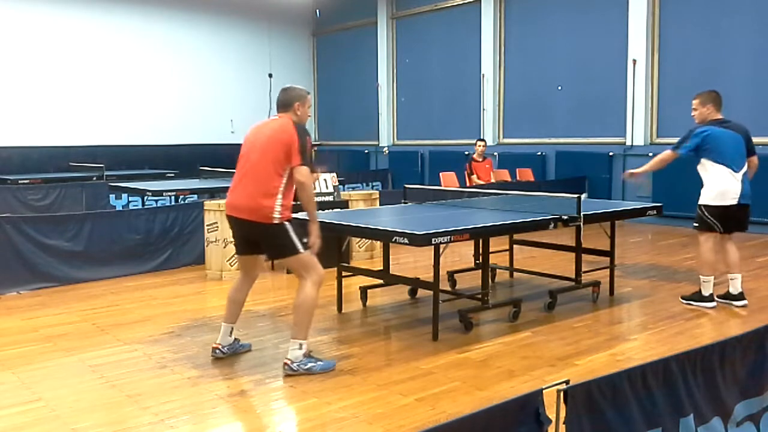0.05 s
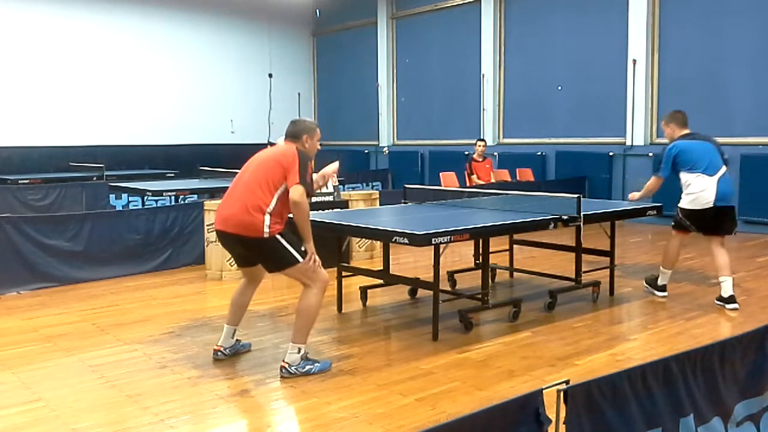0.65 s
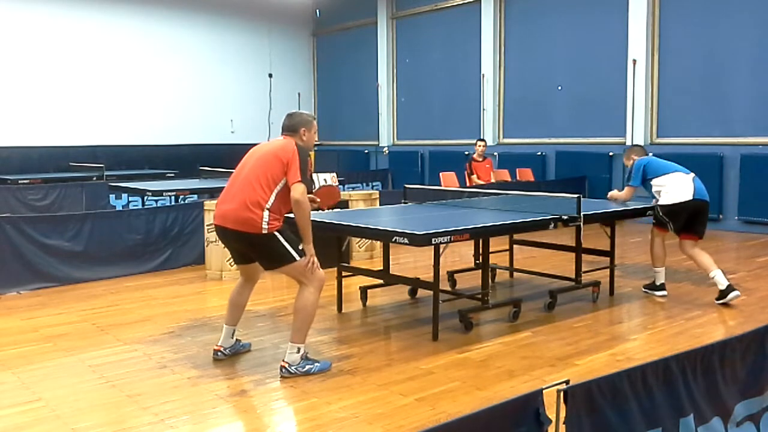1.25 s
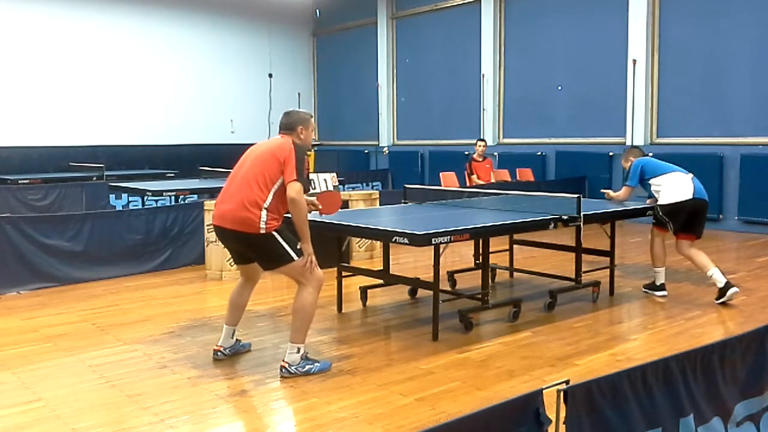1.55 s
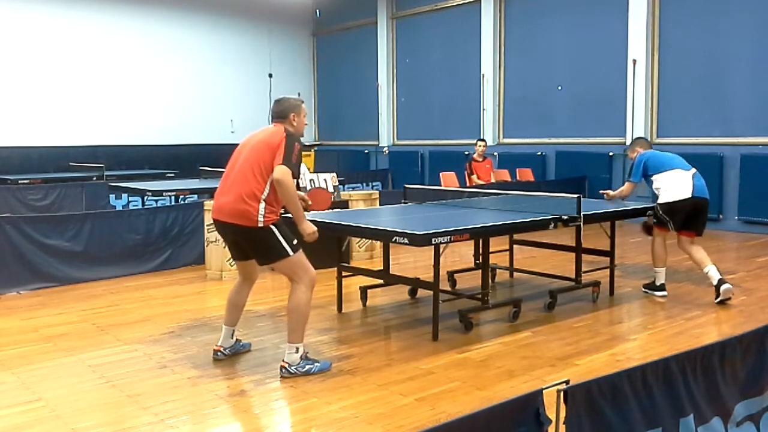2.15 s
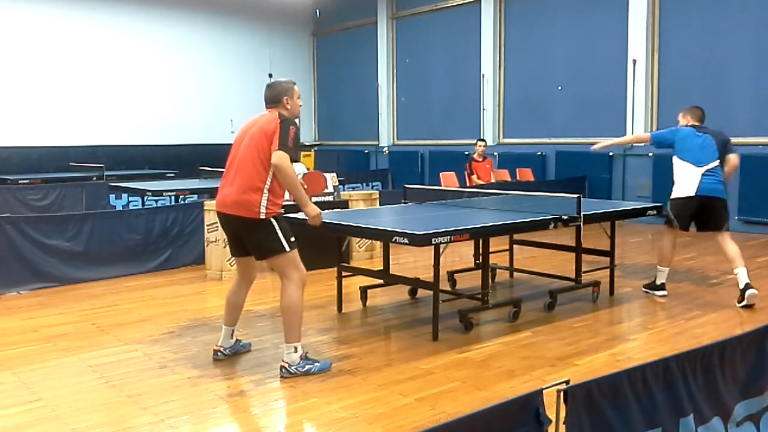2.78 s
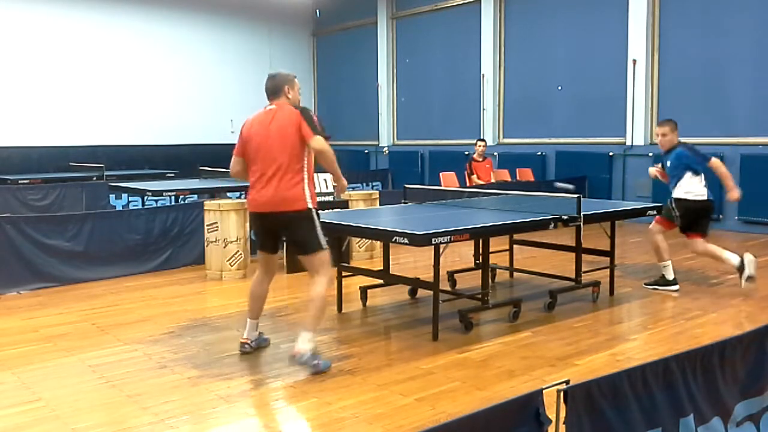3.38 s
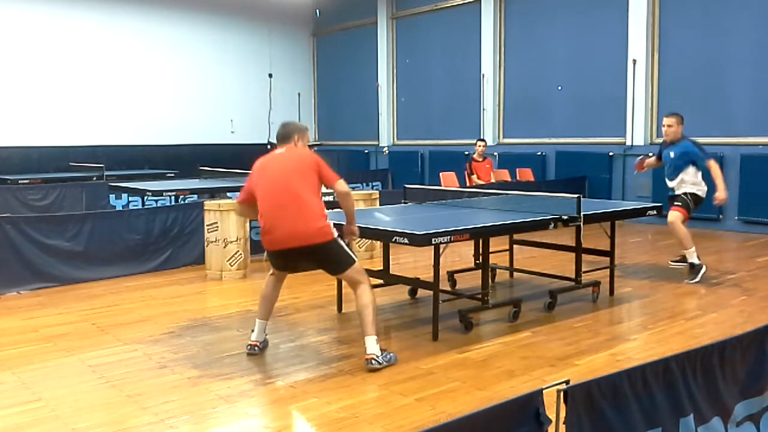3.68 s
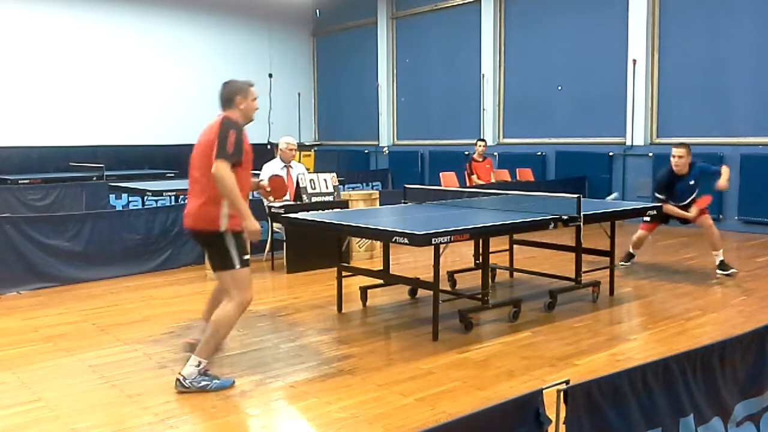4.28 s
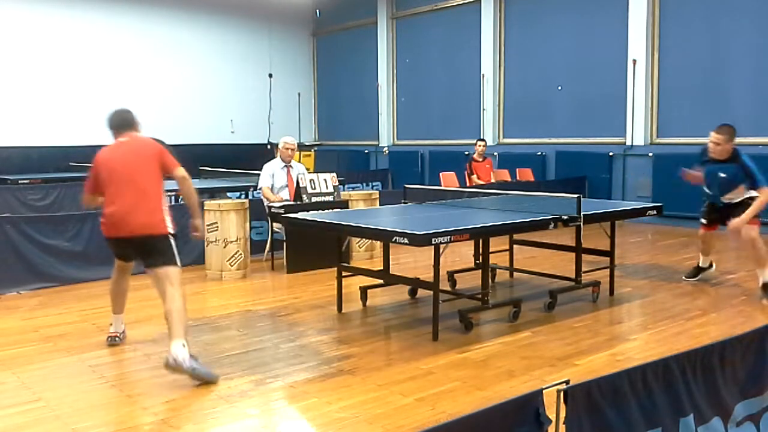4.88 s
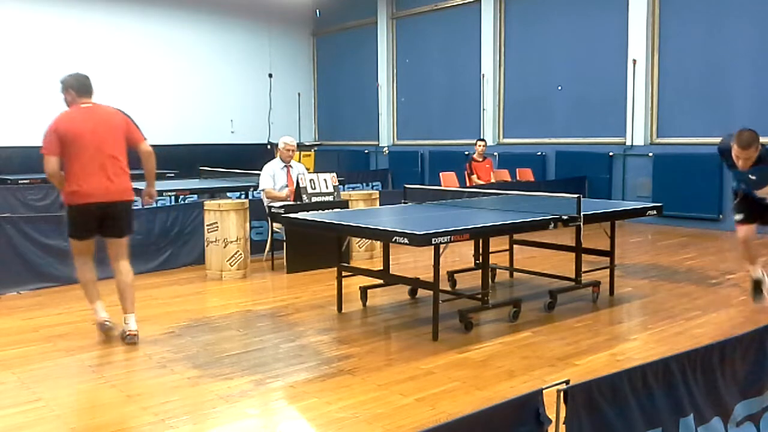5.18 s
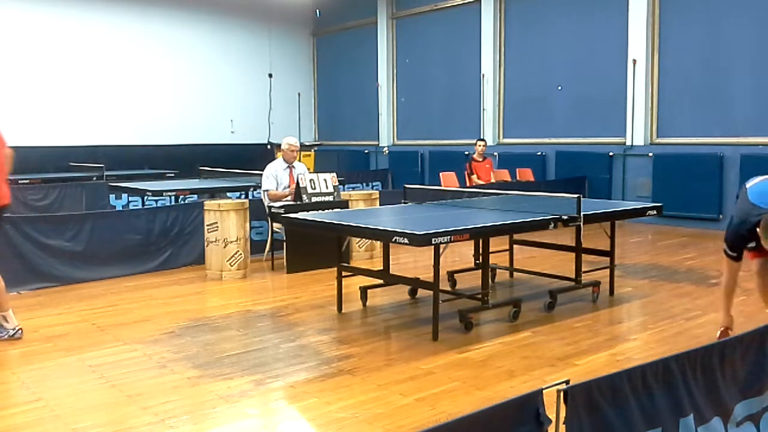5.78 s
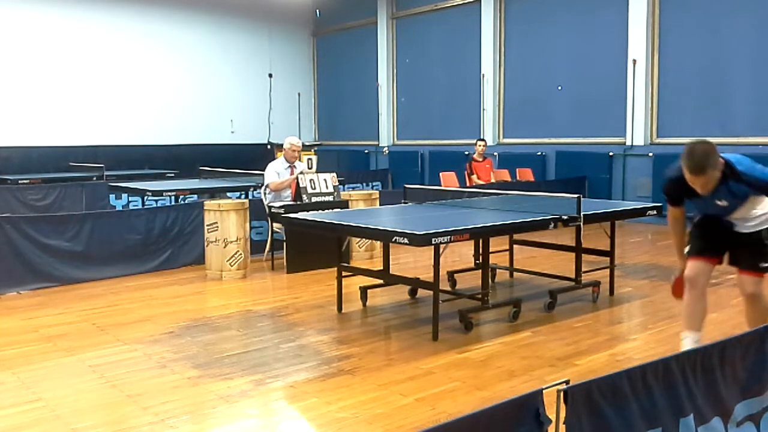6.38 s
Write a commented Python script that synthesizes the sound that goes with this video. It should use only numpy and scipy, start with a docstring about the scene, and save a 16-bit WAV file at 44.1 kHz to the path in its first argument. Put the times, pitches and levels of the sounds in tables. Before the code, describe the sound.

Sharp table tennis ball hits and thudding footsteps on wooden boards ring through a big sports hall during a brief rally.

```python
"""A large, echoing sports hall, with one small microphone listening to a short table tennis rally.
The hollow ball cracks on the bats, pings on the table and bounces on the floor; shoes stamp and
shuffle on sprung wooden boards. Each contact lasts a few milliseconds and comes from a spot of its
own: at this distance, most of what reaches the microphone is the hall ringing on after it."""
import sys
import numpy as np
from scipy import signal
from scipy.fft import rfft, irfft, next_fast_len
from scipy.io import wavfile
from scipy.ndimage import uniform_filter1d

SR = 44100
rng = np.random.default_rng(int(sys.argv[2]) if len(sys.argv) > 2 else 0)


def store_pcm(level_fs):
    """Save levels as 16-bit WAV."""
    pcm = np.round(np.clip(level_fs, -1, 1) * 32767).astype(np.int16)
    wavfile.write(sys.argv[1], SR, np.atleast_2d(pcm).T)


N = 288704

# The ball's strikes. Each row: start in seconds, surface, level in dB, hardness as extra treble in dB,
# direct sound at the microphone in dB.
BALL_STRIKES = [ (-.12, "floor", -39.5, -5, 28), (.097, "floor", -32.5, -6, 25), (.60, "floor", -57, 4, 10),
                (.89, "floor", -54.5, -3.5, 25), (.955, "table", -44, -5, 22),
                (3.265, "rubber", -42.5, 5, 24), (3.277, "rubber", -22, -5, 24.5),
                (3.302, "rubber", -26.5, 14, 30), (3.724, "rubber", -31, 9.5, 31),
                (3.742, "table", -33, 4.5, 27.5), (4.261, "rubber", -31.5, -14, 37),
                (4.317, "table", -27, -3.5, 23), (4.574, "bat rim", -23.5, 1, 26.5),
                (4.727, "rubber", -22.5, -14, 37), (4.767, "rubber", -34.5, 9.5, 46.5),
                (4.969, "floor", -37, 5.5, 33), (5.171, "floor", -35.5, -6.5, 37),
                (5.755, "floor", -34.5, -4, 20), (6.24, "bat rim", -42.5, 0, 14)]
# What the ball strikes decides which parts ring. Each entry: wood, crack, shell ping and snap in dB.
SURFACE_BLENDS = { "rubber": (-2.5, -5.5, -50, -48), "bat rim": (-1, 8.5, -3, -1),
                  "table": (-3, -20, -9, -17), "floor": (-1, 0, -9.5, -1.5)}
# A clearer strike has stronger early echoes. Each row: direct sound in dB, early echoes in dB.
BALL_EARLY_ECHOES = [(20, -52), (28, -5.5), (35, 3)]
def ball_contacts():
    """The surface sets the blend; a harder contact lifts everything above the knock of the wood."""
    for start_s, surface, level_db, hardness_db, direct_db in BALL_STRIKES:
        wood_db, *treble_db = level_db + np.array(SURFACE_BLENDS[surface])
        early_db = np.interp(direct_db, *np.transpose(BALL_EARLY_ECHOES))
        yield start_s, wood_db, *np.add(treble_db, hardness_db), direct_db, early_db


# The resonances of a ball strike, heard close up. Each row: centre in Hz, width in Hz, level in dB.
WOOD_MODES = [(857, 410, 5.5), (1316, 430, 4), (1630, 230, 2)]
CRACK_MODES = [(2660, 1500, -5), (3740, 980, -1), (4540, 730, 5.5), (6000, 1600, -22)]
SHELL_MODES = [(8190, 560, -7), (9740, 120, -7), (10800, 400, -37)]
SNAP_MODES = [(5950, 4600, -2.5), (7730, 2000, -5), (10000, 1600, 1), (10860, 470, 2.5), (12000, 900, -60)]
def ball_hit(levels_db, flex_s=0.002003):
    """The hard, light ball rebounds at once; its shell and the wood flex a moment longer."""
    return smear(contact([WOOD_MODES, CRACK_MODES, SHELL_MODES, SNAP_MODES], levels_db), flex_s)


# Shoes landing around the table. Each row: start in seconds, level in dB, body weight behind the step
# in dB, direct sound at the microphone in dB.
FOOTSTEPS = [ (-.12, -36, 5.5, 8), (.139, -42, -2, 28), (.397, -48, 6, 25), (.60, -54, 13.5, 20),
             (.93, -55, 12, 7), (1.10, -53, 5, 26), (1.309, -62.5, 27.5, 0), (1.48, -68.5, 31.5, 19),
             (1.74, -74.5, 40, 5), (2.476, -63.5, 23, 28.5), (2.66, -66, 29.5, 29.5), (2.77, -61, 17, 15),
             (3.041, -64.5, 26.5, 25), (3.201, -60, 21, 31), (3.277, -17.5, 5.5, 20.5),
             (3.468, -23, -12.5, 29), (3.706, -25, -1, 22), (4.05, -34.5, 11.5, 13),
             (4.255, -30.5, 7.5, 28.5), (4.56, -32, 10, 11), (4.735, -20, 7, 29), (4.89, -26.5, -7, 32.5),
             (5.152, -27.5, 11, 31.5), (5.455, -24.5, 20, 32.5), (5.662, -49, 16, 40),
             (5.98, -35.5, 14.5, 27.5), (6.082, -39.5, 17, 33), (6.225, -41, 13.5, 12)]
# Harder steps stir up stronger early echoes. Each row: step level in dB, early echoes in dB.
STEP_EARLY_ECHOES = [(-32, -44), (-24, 4), (-17, 4)]
def step_contacts(heel_to_toe_s=.017, heel_db=-.5, stamp_from_db=-24.5):
    """Each step lands twice, heel then forefoot; weight drives the floor, and a stamp adds slap."""
    for start_s, level_db, weight_db, direct_db in FOOTSTEPS:
        stamp_db = 0.96 * max(level_db - stamp_from_db, 0)   # in a stamp the sole slaps flat
        joist_db = -21 + weight_db   # the joists take all of the weight, boards and sole a share
        board_db = -7 + 0.36 * weight_db
        slap_db = -6.5 + 0.21 * weight_db + stamp_db
        parts_db = level_db + np.array([joist_db, board_db, 0, slap_db])   # against the sole's knock
        early_db = np.interp(level_db, *np.transpose(STEP_EARLY_ECHOES))
        yield start_s, *(parts_db + heel_db), direct_db, early_db
        yield start_s + heel_to_toe_s, *parts_db, direct_db, early_db


# The resonances of floor and shoe, heard close up. Each row: centre in Hz, width in Hz, level in dB.
JOIST_MODES = [(82.3, 15, -2.5), (121.4, 47, -0.5), (175, 110, 3)]
BOARD_MODES = [(228, 64, -1.2), (344, 220, 1), (457, 270, -0.036), (636, 530, -2.1)]
SOLE_KNOCK_MODES = [(926, 520, -2), (1233, 700, -1), (1480, 420, -1), (1867, 310, -5.5)]
SOLE_SLAP_MODES = [(2136, 840, -0.5), (3040, 1500, -5.5), (3970, 1000, -6), (4543, 1300, 0.5),
                   (6200, 1300, -19)]
def footfall(levels_db, roll_s=.009, rubber_hz=7500):
    """A sole rolls onto the boards over some milliseconds, and the rubber dulls the blow."""
    blow = contact([JOIST_MODES, BOARD_MODES, SOLE_KNOCK_MODES, SOLE_SLAP_MODES], levels_db)
    rubber = signal.butter(3, rubber_hz, fs=SR, output="sos")
    return signal.sosfilt(rubber, smear(blow, roll_s))


def contact(parts, levels_db, size=4096):
    """One blow rings all parts at once; minimum phase makes it start sharply and die away."""
    power = sum(from_db(db) ** 2 * resonances(modes, bins(size)) for modes, db in zip(parts, levels_db))
    cepstrum = irfft(np.log(power + 1e-16) / 2)
    cepstrum[1:size // 2] *= 2
    cepstrum[size // 2 + 1:] = 0
    return irfft(np.exp(rfft(cepstrum)))


def resonances(modes, hz):
    """Power spectrum of a set of steep-sided resonances; mean 1."""
    power = sum(from_db(db) ** 2 / (1 + ((hz ** 2 - centre ** 2) / (hz * width)) ** 2) ** 2
                for centre, width, db in modes)
    return power / power.mean()


def smear(sound, spread_s, count=160):
    """Each frequency arrives after a delay of its own, up to spread_s; the end is faded out."""
    size = len(sound)
    log_hz = np.linspace(np.log(60), np.log(SR / 2), count)
    delay_s = np.interp(np.log(bins(size)), log_hz, spread_s * rng.random(count))
    smeared = irfft(rfft(sound) * np.exp(-2j * np.pi * np.cumsum(delay_s) * SR / size))
    return smeared * np.cos(np.linspace(0, np.pi / 2, size)) ** 2


# The ring of the hall. Each row: band centre in Hz, time to fall by 60 dB in seconds.
HALL_REVERB = [(70, 2.26), (170, 1.4), (450, 2.44), (1300, 2.33), (2800, 2.65), (4600, 2.14), (8300, 1.225),
               (13000, 0.13)]
def hall_decays(size=131072):
    """The hall fades at its own rate in each of several overlapping bands that add up to one."""
    centres, t60 = np.transpose(HALL_REVERB)
    bands = np.array([np.interp(np.log(bins(size)), np.log(centres), row) for row in np.eye(len(t60))])
    fades = from_db(-60 * np.arange(size) / SR / t60[:, None])
    return bands.astype(np.float32), fades.astype(np.float32)


def hall_path(bands, fades, direct_db, early_db, build_s=0.0076, early_s=0.067, mixing_s=.11):
    """From one spot to the microphone: direct sound, separate echoes, then a dense tail."""
    t = np.arange(fades.shape[1]) / SR
    density = np.minimum(.02 + (t / mixing_s) ** 2, 1)   # echoes crowd in with the square of time
    echoes = rng.choice([-1, 1], len(t)) * (rng.random(len(t)) < density) / np.sqrt(density)
    build_up = 1 - np.exp(-(t / build_s) ** 2)
    early_lift = 1 + from_db(early_db) * np.exp(-t / early_s)
    echoes *= build_up * early_lift
    path = (irfft(rfft(echoes.astype(np.float32)) * bands) * fades).sum(axis=0)
    path[0] += from_db(direct_db)
    return path


def across_hall(contacts, source, lead_s=.5):
    """Every contact happens at a spot of its own, so it reaches the microphone with its own echoes."""
    bands, fades = hall_decays()
    lead = round(lead_s * SR)   # room for contacts already ringing at time zero
    at_mic = np.zeros(lead + N)
    for start_s, *levels_db, direct_db, early_db in contacts:
        sound = signal.oaconvolve(hall_path(bands, fades, direct_db, early_db), source(levels_db))
        start = lead + round(start_s * SR)
        at_mic[start:start + len(sound)] += sound[:len(at_mic) - start]
    return at_mic[lead:]


# The empty air of the hall. Each row: frequency in Hz, relative spectral density in dB.
ROOM_TONE_SPECTRUM = [(20, -22), (60, 2), (130, -2.5), (300, -6), (1200, -18), (2800, -25), (4600, -10.5),
                      (6500, -19.5), (10000, -21), (14500, -26)]
def room_tone(level_db=-60):
    """Faint, steady rumble and hiss of the building, all around the microphone."""
    size = next_fast_len(2 * N, True)
    hz, db = np.transpose(ROOM_TONE_SPECTRUM)
    colour = from_db(np.interp(np.log(bins(size)), np.log(hz), db))
    noise = irfft(rfft(rng.standard_normal(size)) * colour)[:N]
    return from_db(level_db) * noise / noise.std()


def from_db(db):
    """Decibels to gain."""
    return 10 ** (np.asarray(db) / 20)


def bins(size):
    """Frequencies of a real FFT in Hz, kept above zero."""
    return np.maximum(np.fft.rfftfreq(size, 1 / SR), 1)


def scene():
    """Ball, shoes and room tone at the one microphone, the same in both channels."""
    shoes = across_hall(step_contacts(), footfall)
    ball = across_hall(ball_contacts(), ball_hit)
    return np.tile(ball + shoes + room_tone(), (2, 1))


def gain_control(x, quiet_db=-47, deepest_db=14, loud_db=-13, squeeze=0.61, window_s=0.086):
    """The recorder pushes quiet stretches further down and holds the loudest back."""
    power = uniform_filter1d(x[0] ** 2, round(window_s * SR))
    level_db = 10 * np.log10(np.maximum(power, 1e-12))
    quiet_cut_db = np.clip(quiet_db - level_db, 0, deepest_db)
    loud_cut_db = squeeze * np.maximum(level_db - loud_db, 0)
    return x * from_db(-quiet_cut_db - loud_cut_db)


def record(dry, cutoff_hz=15400):
    """Behind the microphone: gain control, overload at full scale, and a steep top cut."""
    top_cut = signal.ellip(10, .1, 80, cutoff_hz, fs=SR, output="sos")
    return signal.sosfilt(top_cut, np.clip(gain_control(dry), -1, 1))


dry = scene()
out = record(dry)
store_pcm(out)
```